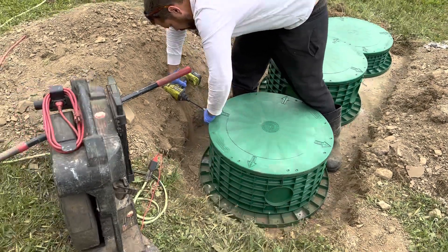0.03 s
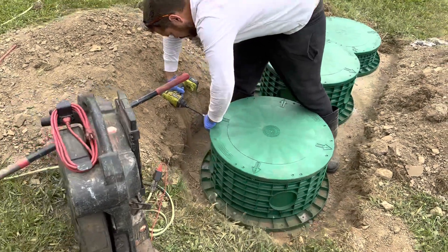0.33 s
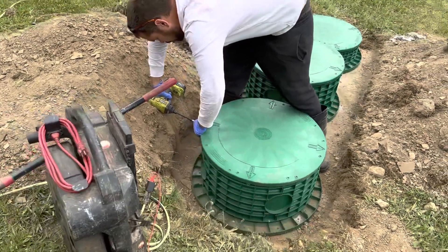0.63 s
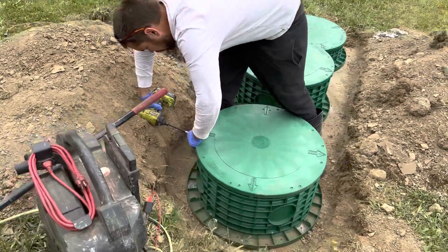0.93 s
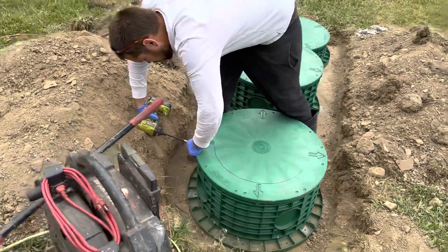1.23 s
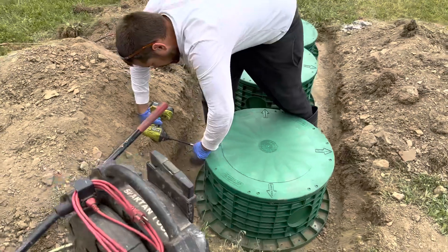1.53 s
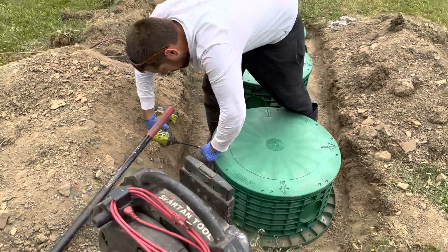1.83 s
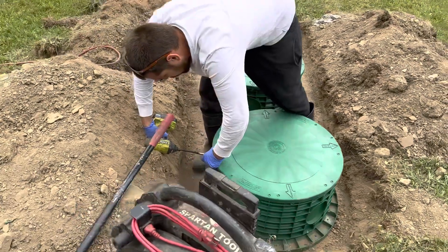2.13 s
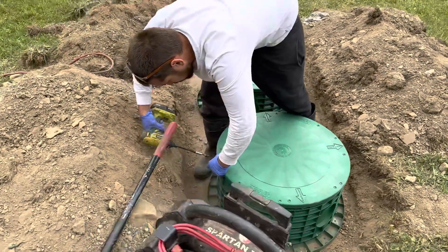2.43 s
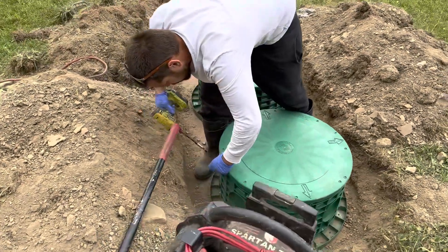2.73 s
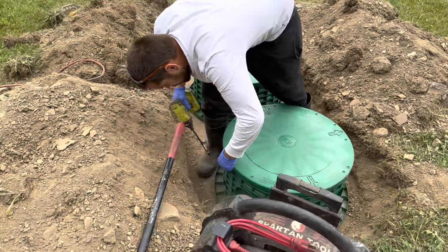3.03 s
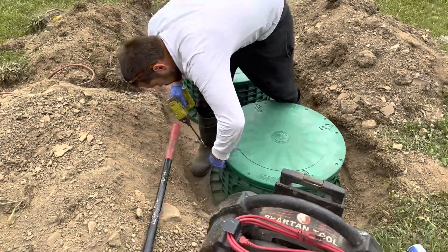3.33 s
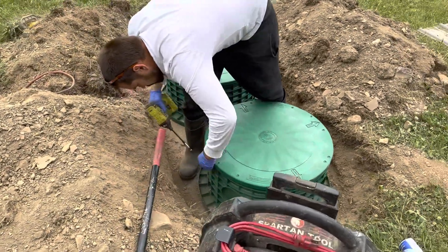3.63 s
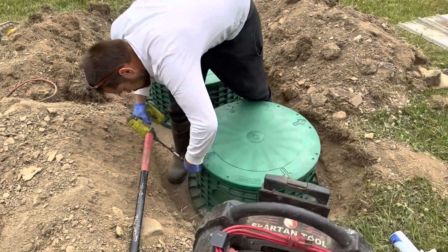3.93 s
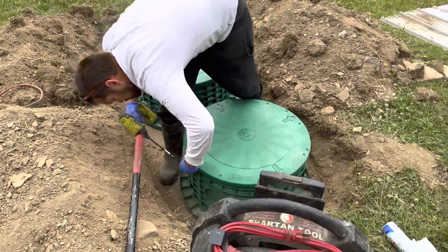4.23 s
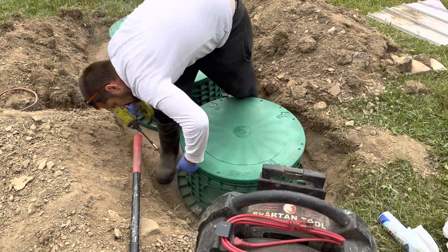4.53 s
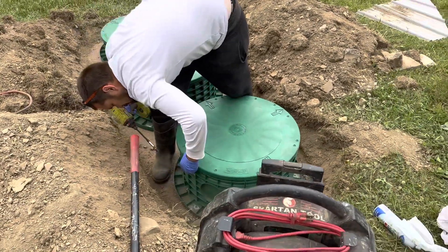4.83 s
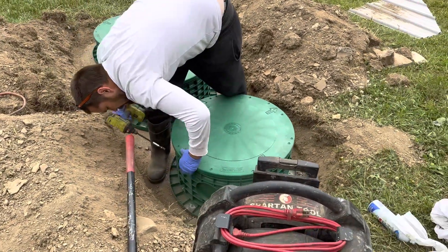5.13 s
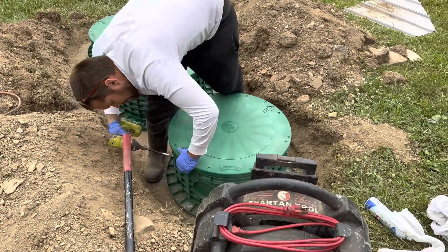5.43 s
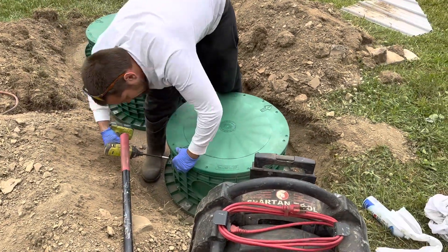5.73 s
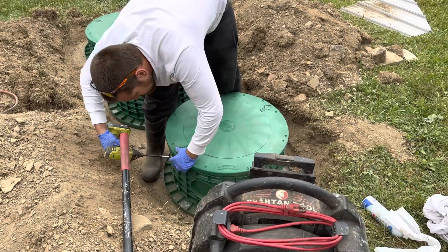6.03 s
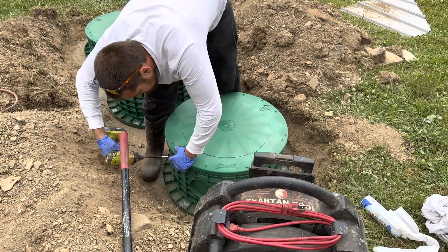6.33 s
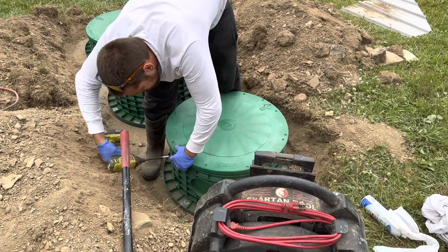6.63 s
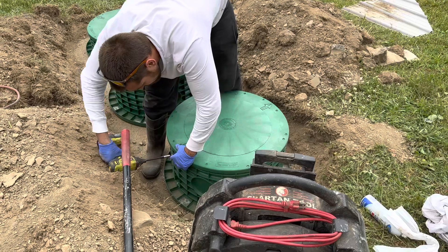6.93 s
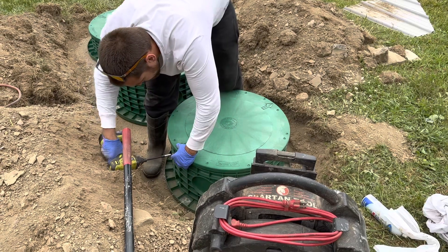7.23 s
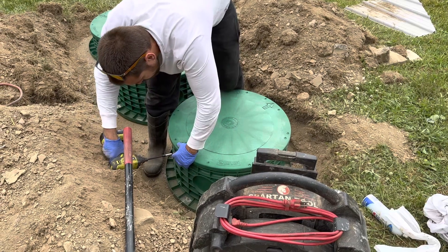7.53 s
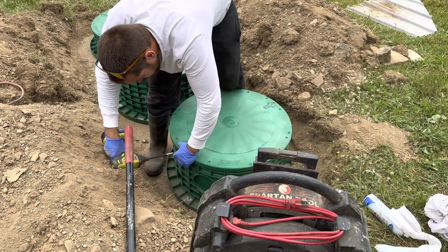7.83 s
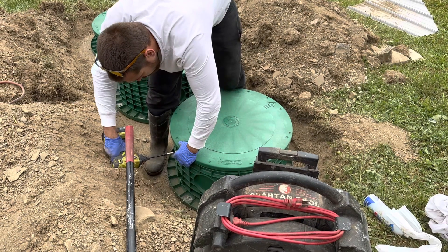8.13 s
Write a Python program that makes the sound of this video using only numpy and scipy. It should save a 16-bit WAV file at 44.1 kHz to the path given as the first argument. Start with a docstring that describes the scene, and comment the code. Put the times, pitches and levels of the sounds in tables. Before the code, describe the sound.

A small pump engine drones outdoors while a nearby drill bit rattles against hollow plastic, groans briefly and stops.

```python
"""A one-cylinder engine drones on a pump truck, some way off to the left of a dug-up yard: its firings
puff through a muffler, piston and valves knock, and gears, fan and pump sing with the crankshaft.
Close to the microphone, a drill's bit skips in a screw head, clacking and drumming on a hollow plastic
tank riser; then the screw bites, groans briefly and stops. The stereo microphone drifts round the
riser in a light wind, with one faint tick of the bit and one gust near the end."""
import sys
import numpy as np
from scipy import signal
from scipy.fft import rfft, irfft, next_fast_len
from scipy.io import wavfile
from scipy.ndimage import uniform_filter1d

SR = 44100
rng = np.random.default_rng(int(sys.argv[2]) if len(sys.argv) > 2 else 0)


def bounce(signal):
    """Save signal as a 16-bit WAV file at the path given by the first command-line argument."""
    frames = np.transpose(np.atleast_2d(signal))
    limited = np.clip(frames, -1, 1)
    pcm = np.round(limited * 32767).astype(np.int16)
    wavfile.write(sys.argv[1], SR, pcm)


N = 361179
T = np.arange(N) / SR
FAN_ORDER, PUMP_ORDER = 39, 48  # multiples of the firing rate
BITE_S, SEATING_S = 1.6, 0.088  # the screw bites; the time it takes to get going

# Engine speed: (time [s], firing rate [Hz])
FIRING_RATE = [(0.0, 28.204), (2.05, 28.444), (2.249, 28.409), (2.6, 28.461), (3.2, 28.4), (4.252, 28.516),
               (5.0, 28.019), (5.551, 28.762), (6.1, 29.146), (6.552, 28.681), (7.1, 28.837), (7.6, 28.826),
               (8.19, 28.321)]
# The microphone's walk round the riser:
# (time [s], position [0-1], clatter level [dB], fan level [dB], pump level [dB])
MIC_WALK = [(0, 0.08, -0.5, -52, -39.5), (2.2, 0.2, -.5, -39.5, -42.5), (2.6, 0.27, 0, -42.5, -42),
            (3.3, 0.36, 0.5, -37.5, -43.5), (3.7, 0.6, 0.5, -48, -44.5), (4.2, 0.72, -1.5, -46, -38),
            (4.55, 0.7, -1.5, -40, -40.5), (5.0, 0.7, -1, -36.5, -43.5), (5.4, 0.79, -.5, -42, -43),
            (6.8, 0.94, 0, -43, -44), (8.19, 0.95, 0.5, -46, -41.5)]
# The engine at the microphone: (frequency [Hz], left over right [dB], left lead [rad], coherence [0-1])
ENGINE_AT_MIC = [(147, 2, 0, 0.875), (320, 0, 0.12, 0.75), (460, -5, 0.8, 0.86), (1133, -1, 1.74, 1),
                 (1363, -5.5, 2.5, 0.71), (1565, -1, 3.5, 0.89), (2620, 0.5, 7, 0.39), (3094, -3, 7.5, 1),
                 (4510, 0.5, 12, 1), (5900, -8.5, 15.5, 0.46), (6900, 4.5, 19, 0.53), (7830, -3.5, 21.5, 1),
                 (10600, 2, 19.5, 0.96)]
def engine(wobble_turns=0.0008, exhaust_lag_turns=0.014):
    """Across the yard, every part follows one crankshaft; a turn here is one firing cycle."""
    position, clatter_db, fan_db, pump_db = curves(MIC_WALK)
    turns = np.cumsum(curves(FIRING_RATE)[0]) / SR + 0.02 + wobble_turns * drift(12)
    firings_s = np.interp(np.arange(1, turns[-1]) + exhaust_lag_turns, turns, T)
    pair = amp(clatter_db) * clatter(turns, position)
    pair[0] += exhaust(firings_s, position) + intake(turns, position) + fan(turns, position, fan_db)
    pair[0] += gears(turns, position) + amp(clatter_db) * (head_ring(turns) + rockers(turns, position))
    return stereo(pair, ENGINE_AT_MIC) + pump(turns, pump_db)


# Tone of the muffler: (multiple of the firing rate, relative level [dB])
MUFFLER_TONE = [(1, -18), (2, 4), (3, -2.5), (4, -3), (5, 1.5), (6, 2.5), (7, -4), (8, -0.5), (9, 1.5),
                (10, -22.5), (11, -11), (12, -6.5), (13, -14.5), (14, -22), (15, -22.5), (16, -26),
                (17, -17.5), (18, -23.5)]
# Chambers of the muffler: (frequency [Hz], width [Hz])
MUFFLER_CHAMBERS = [(72, 70), (90, 11.2)]
def exhaust(firings_s, position, level_db=-24.5, walk_gain_db=2, unevenness=0.02):
    """One puff per firing rings through the muffler; its upper tone opens up along the walk."""
    puffs = strikes(firings_s, 1 + unevenness * rng.standard_normal(len(firings_s)))
    rate_hz = np.mean(np.array(FIRING_RATE)[:, 1])
    tone = [(21, -87.0)] + [(k * rate_hz, db) for k, db in MUFFLER_TONE] + [(750, -39.5), (2000, -65)]
    boom = -evened(cut(colour(puffs, tone)[0], 33, "high", order=1))
    # each chamber holds back the tones near its own pitch, drawing the puff out into a chug
    for hz, width_hz in MUFFLER_CHAMBERS:
        boom = boom - 2 * resonate(boom, hz, width_hz)
    upper_tone = amp(2) * position * resonate(boom, hz=430, width_hz=90)
    return amp(level_db + walk_gain_db * position) * (boom + upper_tone)


# Piston knocks: (place in the cycle [0-1], level in the block [dB], level in the cylinder head [dB])
PISTON_KNOCKS = [(.935, 8, 4.5), (0.02, 5.5, 4), (0.1, 2, 2.5), (.28, 6, 6), (.565, 3, -1.5)]
# Valve ticks: (place in the cycle [0-1], level [dB])
VALVE_TICKS = [(.195, 8.5), (.345, 1.5), (.51, 11), (.61, 1)]
# Clatter from both ends of the walk: (frequency [Hz], level at position 0 [dB], level at position 1 [dB])
CLATTER_TONE = [(447, -33.5, -19), (530, -20, -20.5), (800, -23, -23), (1100, -24, -18), (1290, -15.5, -22),
                (1600, -26.5, -22), (1770, -20, -28), (2470, -29.5, -30), (4970, -34, -33),
                (6460, -38.5, -37), (8400, -33.5, -35.5), (9750, -35, -37), (10900, -54.5, -56.5)]
def clatter(turns, position, repeating_share=0.72, split_hz=3000):
    """Piston and valves knock at fixed places in the cycle; the block rings much alike every time."""
    knocks = fading(cycle_blows(turns, np.array(PISTON_KNOCKS)[:, :2], spread_db=1), decay_s=0.0033)
    ticks = fading(cycle_blows(turns, VALVE_TICKS, spread_db=1), decay_s=0.0055)
    ticks *= amp(-15 + 5 * position)  # the ticks come into the open along the walk
    loose, valves = [evened(np.sqrt(1 + blows ** 2) * noise_pair()) for blows in (knocks, ticks)]
    block = np.sqrt(repeating_share) * block_ring(turns) + np.sqrt(1 - repeating_share) * loose
    metal = cut(cut(block, split_hz, "low") + cut(valves, split_hz, "high"), 370, "high")
    first, last = [colour(metal, np.array(CLATTER_TONE)[:, [0, end]]) for end in (1, 2)]
    return (1 - position) * first + position * last


def block_ring(turns, decay_turns=0.11, size=1548):
    """The block rings in equally strong firing harmonics, leaving out those of gears, fan and pump."""
    place = np.arange(size) / size
    blows = sum(amp(db) * np.exp(-((place - at) % 1) / decay_turns) for at, db, _ in PISTON_KNOCKS)
    one_cycle = np.sqrt(1 + blows ** 2) * rng.standard_normal((2, size))
    harmonics = np.exp(1j * np.angle(rfft(one_cycle)))
    harmonics[:, [round(row[0]) for row in GEAR_TONES] + [FAN_ORDER - 1, FAN_ORDER, PUMP_ORDER]] = 0
    return evened(irfft(harmonics)[:, (turns % 1 * size).astype(int)])


def head_ring(turns, level_db=-39):
    """Every knock pings the cylinder head, with a little play in its timing."""
    knocks = [(place, db) for place, _, db in PISTON_KNOCKS]
    blows = cycle_blows(turns, knocks, spread_db=1.5, play_s=0.00006)
    return amp(level_db) * evened(resonate_twice(blows, hz=2070, width_hz=460))


# Ring of the rocker arms: (frequency [Hz], width [Hz], relative level [dB])
ROCKER_MODES = [(7210, 440, -1.5), (9550, 520, 0)]
def rockers(turns, position, level_db=-50.25, walk_gain_db=6.5):
    """Each valve tick sets the rocker arms sizzling, louder as the walk brings them into the open."""
    ticks = fading(cycle_blows(turns, VALVE_TICKS, spread_db=1.5), decay_s=0.0031)
    rattle = uniform_filter1d(ticks, size=50) * rng.standard_normal(N)
    sizzle = sum(amp(db) * resonate_twice(rattle, hz, width_hz) for hz, width_hz, db in ROCKER_MODES)
    return amp(level_db + walk_gain_db * position ** 3) * evened(sizzle)


def intake(turns, position, place=0.2812, level_db=-54, walk_gain_db=14):
    """Once a cycle the intake gulps air with a short honk, louder along the walk."""
    gulps = cycle_blows(turns, [(place, 0)], spread_db=2)
    return amp(level_db + walk_gain_db * position) * evened(resonate_twice(gulps, hz=425, width_hz=150))


# Gear whine: (multiple of the firing rate, level at position 0 [dB], level at position 1 [dB])
GEAR_TONES = [(20, -44.5, -48), (26, -47.5, -46.5), (31, -48, -46), (36, -50.5, -45), (46, -42.5, -55),
              (47, -40, -51.5), (56, -68, -43), (163.6, -72, -54.5)]
def gears(turns, position, waver_db=2, flutter=0.2):
    """Gears sing at high whole multiples of the firing rate, each wavering in level."""
    whine = np.zeros(N)
    for multiple, first_db, last_db in GEAR_TONES:
        db = first_db + position * (last_db - first_db) + waver_db * drift(3)
        gain = np.sqrt(2) * amp(db) * (1 + flutter * drift(20))
        whine += gain * np.sin(2 * np.pi * (round(multiple) * turns + rng.random()))
    return whine


def fan(turns, position, level_db, flutter=0.21):
    """The blade tone flutters; uneven blades add the multiple below, which grows along the walk."""
    angle = 2 * np.pi * turns
    below = amp(-15 + 17 * position)
    blades = (np.sin(FAN_ORDER * angle) + below * np.sin((FAN_ORDER - 1) * angle)) / np.sqrt(1 + below ** 2)
    return amp(level_db) * evened((1 + flutter * drift(30)) * blades)


def pump(turns, level_db, left_lead_rad=-1.78):
    """Geared to the crankshaft, the pump's clear tone reaches the microphone from its own direction."""
    angle = 2 * np.pi * PUMP_ORDER * turns + np.array([[left_lead_rad], [0]])
    return np.sqrt(2) * amp(level_db) * np.sin(angle)


# Skips of the bit in the screw head: (time [s], crack level [dB])
BIT_SKIPS = [(0.0143, -12.5), (0.0555, -17), (0.0932, -13), (0.1334, -13.5), (0.171, -14.5), (0.222, -16),
             (0.2607, -15.5), (0.3, -8), (0.3424, -10.5), (0.383, -12), (0.4235, -10), (0.4633, -19.5),
             (0.5036, -20), (0.5408, -12), (0.5798, -13.5), (0.618, -12.5), (0.6585, -17.5), (0.698, -15),
             (0.7378, -14), (0.7767, -13), (0.813, -17), (0.8533, -6.5), (0.9241, -19), (0.9648, -11),
             (1.062, -17), (1.103, -11), (1.2112, -12.5), (1.252, -11), (1.2948, -12.5), (1.3347, -18),
             (1.3752, -15.5), (1.4142, -16), (1.484, -19), (1.5243, -17.5), (1.563, -15)]
# The drill at the microphone: (frequency [Hz], left over right [dB], left lead [rad], coherence [0-1])
DRILL_AT_MIC = [(150, 1, 0, 0.87), (343, -0.5, 0.66, 0.9), (730, -7, -0.5, 0.96), (2330, -6, 0.58, 0.86),
                (4370, -1.5, 3, 0.22), (7040, 2.5, 1.5, 0.12), (8000, 1, 2.5, 1), (11100, 0, 0.15, 0.88)]
def drill(snap_delay_s=0.00097, climb_s=0.0105, catch_s=0.0081, rebound_s=0.0132, thump_s=0.00757,
          push_s=0.00584, sag_db_per_s=-1.45):
    """Close up, the bit climbs, catches, snaps into the next slot, thumps the riser and rebounds."""
    start_s, crack_db = np.transpose(BIT_SKIPS)
    snap_s = start_s + snap_delay_s
    ring_db = -14.5 + sag_db_per_s * snap_s  # the bit rings a little less as the push eases
    rumble, scrape = pressure(snap_s)
    climb_play, catch_play, rebound_play = 0.0016 * rng.standard_normal((len(snap_s), 3)).T
    stages_s = (snap_s - climb_s + climb_play, snap_s, snap_s + rebound_s + rebound_play)
    pair = steel_crack(stages_s, crack_db, scrape)
    pair += bit_ring(stages_s, snap_s - catch_s + catch_play, ring_db, scrape)
    pair += riser_wall(start_s - snap_delay_s, start_s + thump_s, ring_db, scrape)
    pair[0] += riser_boom(snap_s - push_s, snap_s + thump_s, rumble)
    return stereo(pair, DRILL_AT_MIC)


def skip_blows(stages_s, db, climb_db=-15, rebound_db=-20):
    """Each skip strikes three times: a light climb, the snap and a faint rebound."""
    return sum(strikes(s, amp(db + step_db)) for s, step_db in zip(stages_s, (climb_db, 0, rebound_db)))


def pressure(snap_s, sag_db_per_s=-3, lull_db=-2, seated_db=-6):
    """Rumble and scrape gains: skips, then the turning screw, shake the riser; seated, it scrapes less."""
    seated = ramp(BITE_S, SEATING_S)
    shaken = np.minimum(fading(strikes(snap_s, 1.0), decay_s=0.038) + seated, 1)
    rumble = amp(-20 + sag_db_per_s * T + lull_db * (1 - shaken))
    scrape = amp(-32 + seated_db * seated)
    return rumble * trigger(), scrape * trigger()


def trigger(let_go_s=1.99, run_down_s=0.017):
    """1 while the drill is driven, dying away once it is let go."""
    return np.exp(-np.maximum(T - let_go_s, 0) / run_down_s)


# Steel on steel, heard close: (frequency [Hz], relative level [dB])
CRACK_TONE = [(450, -18), (800, -14), (1500, -4), (3800, 3.5), (5700, -16), (7500, 0), (9800, 1.5),
              (11000, -9.5), (15500, -17)]
def steel_crack(stages_s, crack_db, scrape, hiss_db=-21):
    """The bit cracks against the slot; a clean snap over its edge adds a bright splinter of sound."""
    snaps = fading(skip_blows(stages_s, crack_db + 5), decay_s=0.0012)
    envelope = uniform_filter1d(snaps, size=8) + amp(hiss_db) * scrape
    crack = amp(2.5) * colour(envelope * noise_pair(), CRACK_TONE)
    splinter = fading(strikes(stages_s[1], amp(crack_db - 3)), decay_s=0.00047)
    return crack + cut(splinter * noise_pair(), 11000, "high")


# Ring of the steel bit and chuck: (frequency [Hz], width [Hz], relative level [dB])
BIT_MODES = [(682, 13, -1.5), (796, 16, -0.5), (1240, 79, -5.5), (1618, 120, -3), (2137, 255, 1.5),
             (2538, 116, -1.5)]
def bit_ring(stages_s, catch_s, ring_db, scrape, catch_spread_db=3):
    """Skips and scraping ring the bit and chuck; a hard catch on the edge doubles the clack."""
    catch = amp(ring_db - 5 + catch_spread_db * rng.standard_normal(len(catch_s)))
    chatter = fading(skip_blows(stages_s, ring_db + 5) + strikes(catch_s, catch), decay_s=0.0036)
    grind = (uniform_filter1d(chatter, size=60) + scrape) * noise_pair()
    return amp(12.5) * sum(amp(db) * resonate(grind, hz, width_hz) for hz, width_hz, db in BIT_MODES)


def riser_wall(slip_s, thump_s, ring_db, scrape):
    """The plastic wall answers in the mids as the bit lets go and again at the thump."""
    flex = fading(strikes(slip_s, amp(ring_db)) + strikes(thump_s, amp(ring_db)), decay_s=0.0036)
    return amp(3) * resonate((flex + scrape) * noise_pair(), hz=900, width_hz=650)


# Modes of the hollow riser: (frequency [Hz], time to fall 60 dB [s], level [dB])
RISER_MODES = [(75.4, 0.19, -14.5), (98, 0.13, -19), (146.4, 0.069, -24), (179.4, 0.07, -27.5),
               (218, 0.063, -23.5), (283.5, 0.054, -19.5), (323, 0.026, -40)]
def riser_boom(push_s, thump_s, rumble, push_db=-6, thump_db=-4, spread_db=1.9):
    """The climb pushes the wall and the snap thumps it one swing later, so the lowest mode booms on."""
    t = T[:SR // 3]
    ring = sum(amp(db - 60 * t / t60) * np.sin(2 * np.pi * hz * t) for hz, t60, db in RISER_MODES)
    force = amp(spread_db * rng.standard_normal(len(push_s)))
    blows = strikes(push_s, force * amp(push_db)) + strikes(thump_s, force * amp(thump_db))
    boom = signal.oaconvolve(blows, ring)[:N]
    shudder = signal.oaconvolve(rng.standard_normal(N), ring)[:N]
    return cut(boom, 57, "high") + rumble * evened(cut(shudder, [125, 380], "band"))


def groan(start_hz=80.26, end_hz=89, waver=0.053, level_db=-17.5, fade_db_per_s=-25):
    """The biting screw sticks and slips at a low, uneven pitch that climbs as it gets going."""
    rise = ramp(BITE_S, SEATING_S)
    hz = start_hz + (end_hz - start_hz) * rise
    angle = 2 * np.pi * np.cumsum(hz * (1 + waver * drift(40))) / SR
    envelope = rise ** 2 * amp(level_db + fade_db_per_s * np.maximum(T - BITE_S, 0)) * trigger()
    return envelope * evened(np.sin(angle) + amp(-9) * np.sin(3 * angle))


def tick(at_s=7.5743, level_db=-25):
    """Near the microphone the bit touches the screw head: a faint tick, nearly all high treble."""
    touch = fading(strikes(np.array([at_s]), amp(level_db)), decay_s=0.0011)
    return cut(touch * rng.standard_normal(N), 13500, "high", order=1)


def wind(level_db=-37.5, gust_db=7, gust_start_s=7.55, gust_end_s=8.18, ramp_s=0.18):
    """Wind rumbles low in the background, with one gust near the end."""
    tone = [(40, -3), (70, -6.5), (300, 1.0), (450, -7.5), (1200, -33.0), (4000, -89)]  # (Hz, dB)
    gust = ramp(gust_start_s, ramp_s) - ramp(gust_end_s - ramp_s, ramp_s)
    return amp(level_db + gust_db * gust) * evened(colour(rng.standard_normal(N), tone))


def amp(db):
    """Decibels to gain."""
    return 10 ** (np.asarray(db) / 20)


def evened(x):
    """Scales to rms 1."""
    return x / np.sqrt(np.mean(x ** 2) + 1e-20)


def noise_pair():
    """Two unrelated white noises."""
    return rng.standard_normal((2, N))


def ramp(start_s, length_s):
    """Rises from 0 to 1, then holds."""
    return np.clip((T - start_s) / length_s, 0, 1)


def drift(rate_hz):
    """A slow random wander of rms 1."""
    count = int(2 * rate_hz * T[-1]) + 2
    path = signal.resample(rng.standard_normal(2048)[:count], 8 * count)
    return evened(np.interp(T, np.linspace(0, T[-1], len(path)), path))


def curves(rows):
    """Each column of a time table, sample by sample."""
    s, *columns = np.transpose(rows)
    return [np.interp(T, s, c) for c in columns]


def spectra(rows, hz):
    """Each column of a frequency table, joined on a log axis."""
    f, *columns = np.transpose(rows)
    return [np.interp(np.log(hz + 1), np.log(f + 1), c) for c in columns]


def colour(x, rows, size=8192):
    """Causal filter shaped by rows of (frequency [Hz], level [dB])."""
    log_gain = np.log(amp(spectra(rows, abs(np.fft.fftfreq(size, 1 / SR)))[0]))
    minimum_phase = np.exp(np.conj(signal.hilbert(log_gain)))
    ring = np.fft.ifft(minimum_phase).real[:size // 2]
    return signal.oaconvolve(np.atleast_2d(x), ring[None], axes=1)[:, :N]


def cut(x, hz, kind, order=3):
    """High-pass, low-pass or band-pass."""
    return signal.sosfilt(signal.butter(order, hz, kind, fs=SR, output="sos"), x)


def resonate(x, hz, width_hz):
    """One resonance of gain 1."""
    return signal.lfilter(*signal.iirpeak(hz, hz / width_hz, SR), x)


def resonate_twice(x, hz, width_hz):
    """A resonance with steeper skirts: a second, twice as wide, follows the first."""
    return resonate(resonate(x, hz, width_hz), hz, 2 * width_hz)


def strikes(s, size):
    """Single-sample blows at the given times."""
    return np.bincount(np.clip(np.round(s * SR).astype(int), 0, N - 1), size * np.ones(len(s)), N)


def fading(blows, decay_s):
    """Each blow jumps up and dies away."""
    return signal.lfilter([1], [1, -np.exp(-1 / (decay_s * SR))], blows + 1e-15)


def cycle_blows(turns, rows, spread_db, play_s=0):
    """Blows at fixed places in every engine cycle, uneven in force and, given play, in timing."""
    blows = np.zeros(N)
    for place, db in rows:
        force, late = rng.standard_normal((2, 256))
        s = np.interp(np.arange(len(late)) + place, turns, T)
        blows += strikes(s + play_s * late, amp(db + spread_db * force) * (s < T[-1]))
    return blows


def stereo(pair, rows):
    """The microphone's two sides: both hear the first signal, and the left blends in the second."""
    size = next_fast_len(N + 2048)
    balance_db, lead, coherence = spectra(rows, np.fft.rfftfreq(size, 1 / SR))
    shared, unrelated = rfft(pair, size)
    blend = coherence * shared + np.sqrt(1 - coherence ** 2) * unrelated
    left = blend * amp(balance_db) * np.exp(1j * lead)
    equal_power = np.sqrt(2 / (1 + amp(balance_db) ** 2))
    return irfft(np.array([left, shared]) * equal_power, size)[:, :N]


def scene():
    """The distant engine, the close work at the riser and a little wind."""
    return engine() + drill() + groan() + tick() + wind()


def record(dry, knee=0.23, headroom=0.27, edge_hz=16300):
    """The microphone sheds the deepest bass and rounds the highest peaks; then the band limit."""
    thinned = cut(dry, 36, "high", order=2)
    within = np.clip(thinned, -knee, knee)
    rounded = within + headroom * np.tanh((thinned - within) / headroom)
    band_limit = signal.firwin(255, edge_hz, window=("kaiser", 9), fs=SR)
    return signal.oaconvolve(rounded, band_limit[None], "same", axes=1)


dry = scene()
out = record(dry)
bounce(out)
```